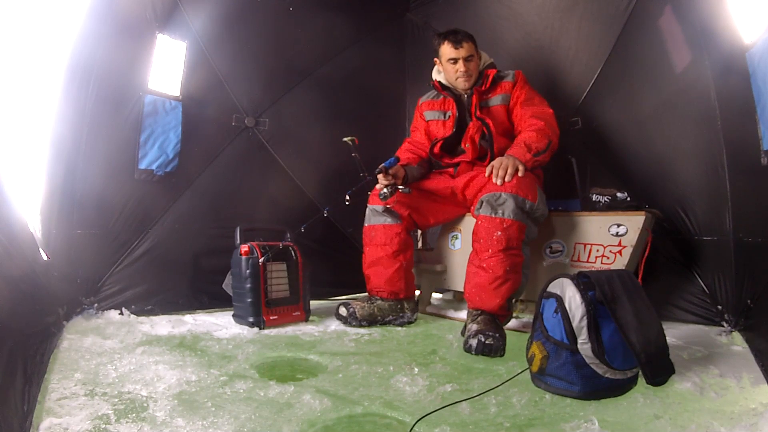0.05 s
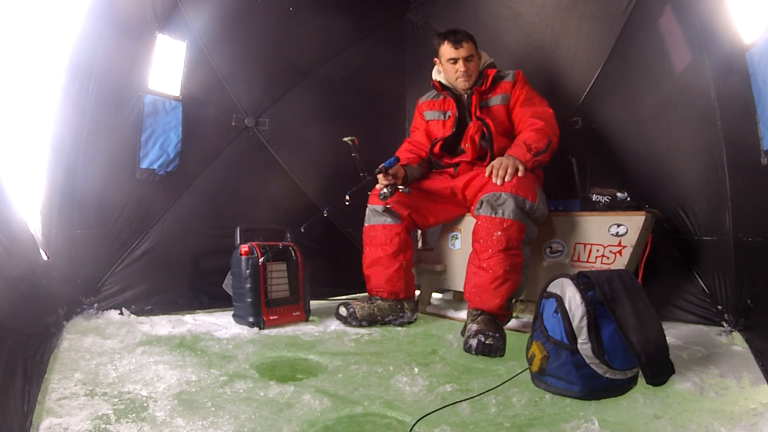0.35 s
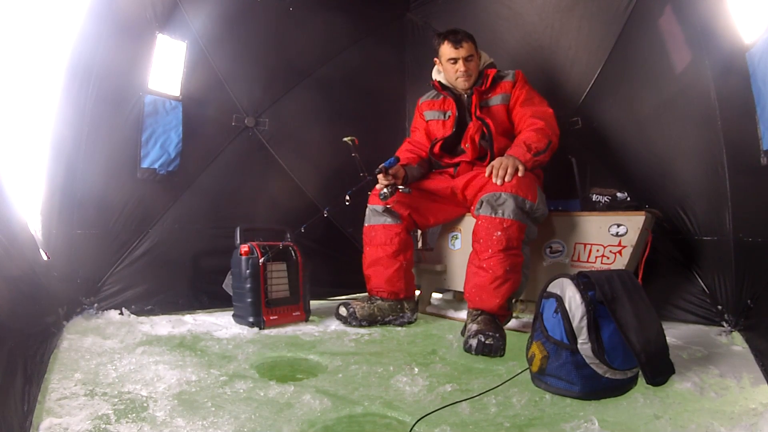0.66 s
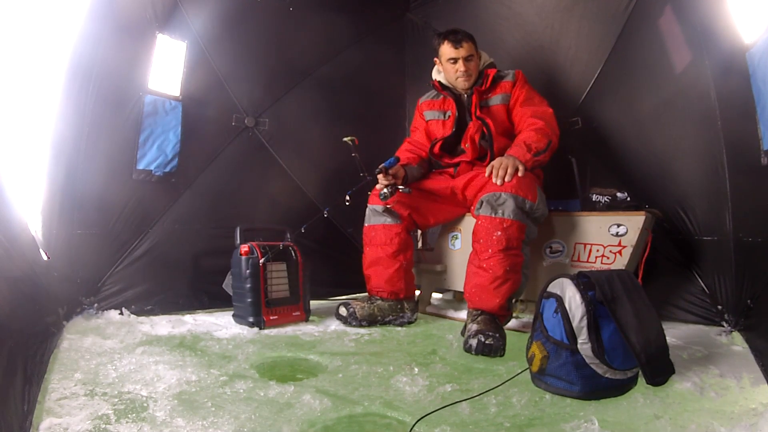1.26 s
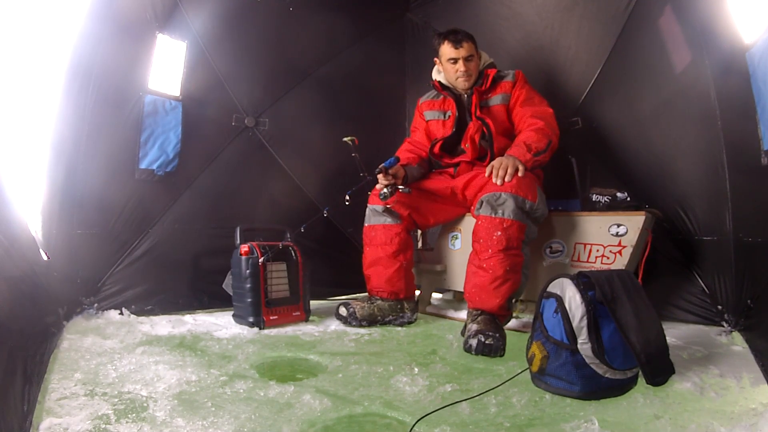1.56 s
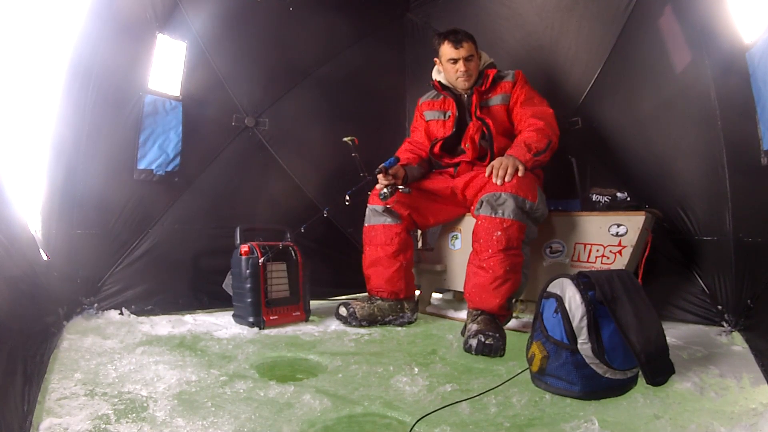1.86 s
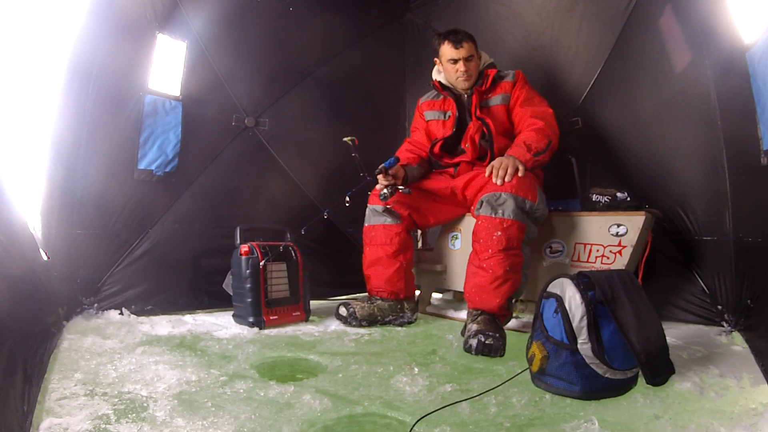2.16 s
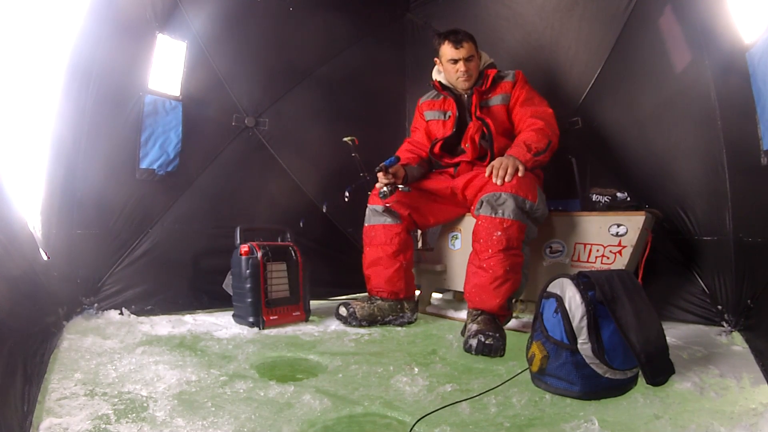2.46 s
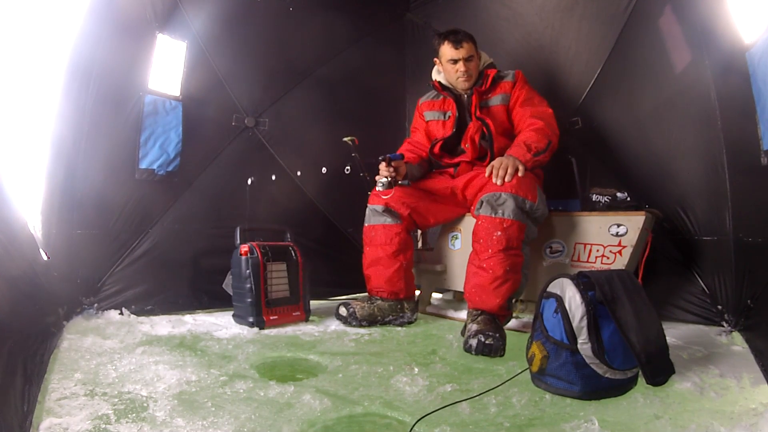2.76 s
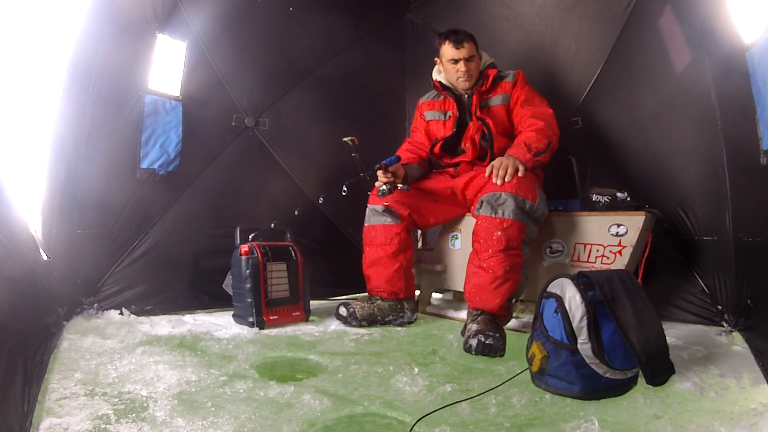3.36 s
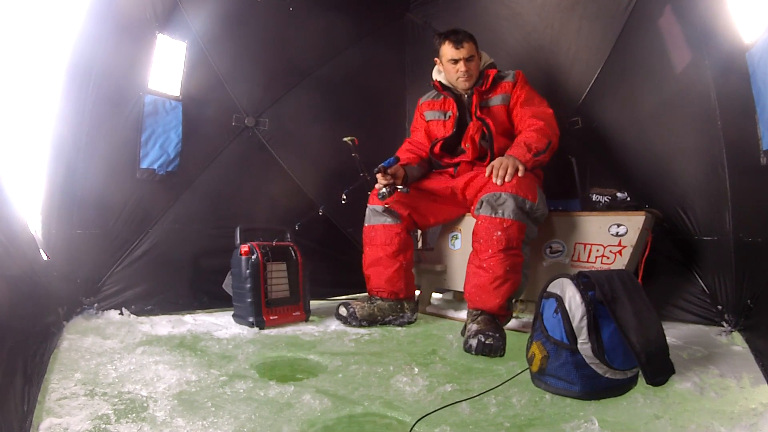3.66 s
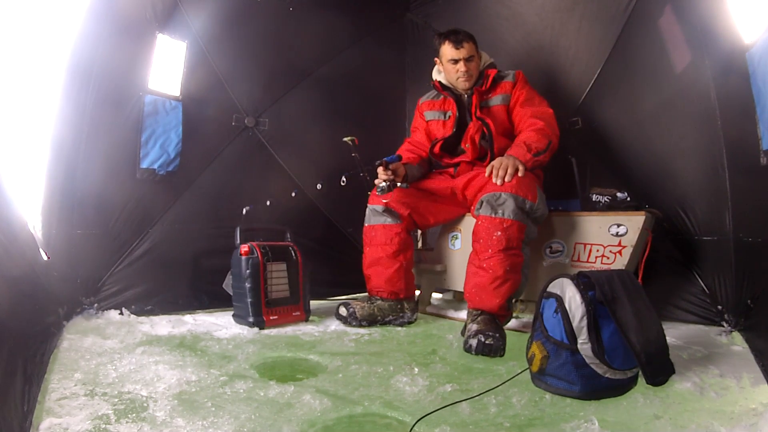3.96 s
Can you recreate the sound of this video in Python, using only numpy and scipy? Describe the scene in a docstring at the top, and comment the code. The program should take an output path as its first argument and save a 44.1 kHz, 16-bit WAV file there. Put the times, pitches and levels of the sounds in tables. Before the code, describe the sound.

Lake ice cracks under a fishing shelter: a faint chirp first, then one sharp, crunchy snap, followed by scattered glassy chirps and dull thumps. A faint low rumble and hiss continue underneath, heard from inside the shelter.

```python
"""Glassy, falling chirps ring out over a low rumble: lake ice cracking under a fishing shelter.
Each crack bends the ice sheet in a wave whose high notes travel fastest, so it arrives as a chirp
(the farther, the slower) in a wash of scattered waves. Far-off cracking merges into a rumble that
keeps the shelter booming, and a few tiny ticks sound close by. The recorder hisses and holds its
samples at a low rate, which adds the glassy sheen to every crack."""
import sys
import numpy as np
from scipy import signal
from scipy.fft import rfft, irfft
from scipy.io import wavfile

SR = 44100
rng = np.random.default_rng(int(sys.argv[2]) if len(sys.argv) > 2 else 0)


def dump(signal):
    """Clip the signal to [-1, 1] and save it as 16-bit WAV at the path in sys.argv[1]."""
    limited = np.clip(np.atleast_2d(signal).T, -1, 1)
    pcm = np.round(limited * 32767).astype(np.int16)
    wavfile.write(sys.argv[1], SR, pcm)


N = 176400
HZ = np.maximum(np.arange(N + 1) * SR / (2 * N), 1)  # frequencies in a spectrum of 2 * N samples


def from_db(db):
    """Turn decibels into a number to multiply by."""
    return 10 ** (np.asarray(db) / 20)


def rms_one(x):
    """Scale a signal so that its average strength (rms) is 1."""
    return x / np.sqrt(np.mean(x ** 2) + 1e-20)


def level(points):
    """Gain over time from (time [s], level [dB]) points."""
    return from_db(np.interp(np.arange(N) / SR, *np.transpose(points)))


def colour(points, hz):
    """Gain at each frequency from (frequency [Hz], level [dB]) points."""
    point_hz, db = np.transpose(points)
    return from_db(np.interp(np.log(hz), np.log(point_hz), db))


def noise(points):
    """Noise of strength 1 with the given colour, its balance of lows and highs."""
    return rms_one(irfft(rfft(rng.standard_normal(2 * N)) * colour(points, HZ))[:N])


def drift(rate_hz):
    """A random wobble of strength 1, mostly slower than the given rate."""
    return rms_one(irfft(rfft(rng.standard_normal(2 * N)) / (1 + (HZ / rate_hz) ** 2))[:N])


def background():
    """A faint, steady, low noise lies under everything."""
    # colour of the noise: (frequency [Hz], relative level [dB])
    tone = [(15, -28), (25, -11.5), (50, -5.5), (85, -3.5), (105, -1.5), (125, 2.5), (180, 1.5), (260, -10),
            (400, -24.5), (700, -33), (1500, -40.5), (5000, -62.5)]
    return from_db(-51) * noise(tone)


def far_rumble():
    """Many distant cracks blur into one rumble that swells and sinks."""
    # loudness of the rumble: (time [s], relative level [dB])
    swells = [(0.03, -66), (0.59, -63.5), (0.66, -56), (1.18, -60), (1.59, -57), (1.65, -46.5),
              (1.7, -52.5), (2.38, -59), (2.45, -54), (2.51, -61.5), (2.84, -55.5), (2.88, -47.5),
              (3.15, -60), (3.21, -49.5), (3.59, -61), (3.74, -55), (3.78, -59), (4.0, -63)]
    # colour of the rumble: (frequency [Hz], relative level [dB])
    tone = [(100, -22), (160, -5.5), (220, -2), (265, -2), (320, -10), (420, -13.5), (560, -20),
            (800, -30.5), (1500, -44.5), (5000, -64)]
    return from_db(0.5) * level(swells) * noise(tone)


def shelter_boom():
    """The shelter's low note, kept going by far-off cracking, wavers in pitch and loudness."""
    # loudness of the boom: (time [s], relative level [dB])
    swells = [(0.0, -41), (0.07, -38), (0.24, -61.5), (0.95, -47.5), (0.99, -80), (1.19, -40), (1.29, -50),
              (1.5, -40), (1.61, -45.5), (1.67, -36), (1.73, -49), (1.84, -39.5), (2.06, -57.5),
              (2.13, -35), (2.16, -54.5), (2.37, -48), (2.43, -66), (2.46, -53.5), (2.72, -51.5),
              (2.94, -45.5), (3.17, -58), (3.24, -41), (3.35, -44.5), (3.42, -61), (3.49, -40.5),
              (3.53, -64), (3.58, -44), (3.71, -63.5), (3.77, -48.5), (4.0, -48.5)]
    pitch_hz = 165.6 + 6.16 * drift(rate_hz=26.9)
    note = np.sqrt(2) * np.sin(2 * np.pi * np.cumsum(pitch_hz) / SR)
    flutter = from_db(-2.15 + 1.78 * drift(rate_hz=22.6))
    return level(swells) * note * flutter


def ticks():
    """Tiny clicks inside the shelter ring for a few milliseconds."""
    # the clicks: (time [s], relative level [dB])
    clicks = [(0.0816, -61), (0.1125, -67), (3.5162, -72)]
    # notes in each click: (frequency [Hz], relative level [dB], time to fade by 60 dB [s])
    notes = [(2380, 7, 0.0067), (4470, 6, 0.0096)]
    out, t = np.zeros(N + SR), np.arange(SR // 10) / SR
    ring = sum(from_db(db - 60 * t / fade_s) * np.sin(2 * np.pi * hz * t) for hz, db, fade_s in notes)
    for time_s, db in clicks:
        start = int(time_s * SR)
        out[start:start + len(t)] += from_db(db) * ring
    return out[:N]


def shelter(hz):
    """How the shelter changes each frequency: sound bounces between its walls and makes it ring."""
    # notes at which the shelter and its floor ring: (frequency [Hz], width [Hz], gain [dB])
    resonances = [(168, 37, -0.5), (540, 53, 1.5), (745, 33, -2), (1033, 33, 2), (1197, 62, -4.5),
                  (1480, 100, -8), (1590, 35, 1), (1910, 100, -13), (2250, 110, -6), (2360, 69, -2),
                  (2560, 33, -6), (2850, 51, 0)]
    round_trip_s, echo_db = .00303, -15.5  # each round trip turns the wave upside down
    direct_and_echoes = 1 / (1 + from_db(echo_db) * np.exp(-2j * np.pi * hz * round_trip_s))
    ringing = sum(from_db(db) / (1 + 2j * (hz - centre) / width) for centre, width, db in resonances)
    return direct_and_echoes + ringing


def splinters():
    """The nearest crack splinters the surface of the ice with a short, bright, grainy crunch."""
    # colour of the crunch: (frequency [Hz], relative level [dB])
    tone = [(500, -19), (1000, -4), (1700, 2.5), (2300, -5), (2900, -5), (3700, -12.5), (5000, -13.5),
            (6000, -29)]
    start_s, rise_s, fade_s = 1.642, 0.013, 0.16
    age = np.maximum(np.arange(N) / SR - start_s, 0)
    envelope = np.minimum(age / rise_s, 1) * from_db(-41.5 - 60 * age / fade_s)
    crunch = noise(tone) * from_db(-1.5 * drift(rate_hz=460))  # the fast wobble makes it grainy
    in_shelter = irfft(rfft(crunch, 2 * N) * shelter(HZ))[:N]
    return envelope * rms_one(in_shelter)


def scattered_waves(t, hz, fade_s):
    """Spectrum of the waves scattered by flaws in the ice; each octave fades at its own rate."""
    late_db, late_fade_s = -14.5, 0.66  # a quieter tail that lingers
    octaves_hz = 125 * 2.0 ** np.arange(7)
    spectrum = 0
    for k, centre in enumerate(octaves_hz):
        age = np.maximum(t, 0) * (centre / 1000) ** 0.81  # high notes die first
        fade = from_db(-60 * age / fade_s) + from_db(late_db - 60 * age / late_fade_s)
        tail = rng.standard_normal(len(t)) * fade * (t > 0)
        octave_share = np.interp(np.log(hz), np.log(octaves_hz), np.eye(len(octaves_hz))[k])
        spectrum = spectrum + np.sqrt(octave_share) * rfft(tail)
    fade_energy = fade_s * SR / (2 * np.log(1000))
    return spectrum / np.sqrt(fade_energy)


def cracks():
    """Fast waves swell up first; then the bending ice stretches each snap into a falling chirp."""
    # cracks in the ice: (time [s], delay at 1 kHz [s], snap relative level [dB], ring pitch [Hz],
    # ring gain [dB], ring sharpness [Q], scatter relative level [dB], bass edge [Hz], treble edge [Hz],
    # swell head start [s], swell relative level [dB], time for scatter at 1 kHz to fade by 60 dB [s])
    events = [(.465, .066, -11, 270, 9, 4.8, -25, 220, 1010, .02, -31, .25),
              (1.351, .012, -33, 595, 0, 5, -14, 400, 1380, 0.053, -16, 0.39),
              (1.6420, 0.00357, 7.5, 1880, -0.5, 3.7, 4.8, 109, 2300, 0.0057, 1, 0.096),
              (1.782, .023, -16, 1550, 16, 5.8, -6.5, 276, 2070, 0.032, -9.5, 0.2),
              (2.070, .043, -21, 990, 19.5, 6.3, -6, 300, 1290, .012, -10, 0.16),
              (2.294, 0.047, -12, 300, 14, 3.2, -19, 220, 384, .02, -31, 0.12),
              (2.514, .005, 10, 84, 17.5, 6.9, -5, 59.4, 105, .02, -25, 0.11),
              (2.8332, .0135, -2.5, 646, 7.5, 3.8, -3, 260, 1920, .023, -6, 0.21),
              (3.175, .014, -25, 540, 37, 55, -4.5, 430, 1470, 0.031, -2, .29),
              (3.18, 0.01, -1.5, 240, 6, 5.9, -16, 130, 296, .02, -15, 0.4),
              (3.549, 0.05, -16, 240, 1, 5.4, -19, 200, 340, .02, -31, .25),
              (3.951, 0.017, -13, 540, 4, 13, -13, 302, 706, 0.023, -23, 0.39)]
    # what a crack carries through the ice: (frequency [Hz], relative level [dB])
    tone = [(60, -7), (170, 9), (330, 7), (500, 0.5), (800, -0.5), (1200, -1.5), (1370, -3.5), (1800, 0),
            (2500, -5), (3600, -3), (5500, -1.5)]
    treble_slope, bass_slope = 5.2, 2.1  # steepness of the edges, in steps of 6 dB per octave
    out, early = np.zeros(N + 2 * SR), SR // 8  # early leaves room for the swell
    t = (np.arange(SR) - early) / SR
    hz = np.maximum(np.arange(SR // 2 + 1), 1)
    path = from_db(-10) * colour(tone, hz) * shelter(hz)
    for (time_s, delay_s, snap_db, ring_hz, ring_db, sharpness, scatter_db,
         bass_hz, treble_hz, lead_s, swell_db, fade_s) in events:
        rise = from_db(8 * np.minimum(t, delay_s) / (lead_s + delay_s))
        swell = rise * (t > -lead_s) * (t < delay_s) * rng.standard_normal(SR)
        fast_waves = from_db(swell_db) * rfft(rms_one(swell)) / np.sqrt(SR)
        ring = from_db(ring_db) / (1 + 1j * sharpness * (hz / ring_hz - ring_hz / hz))
        snap = from_db(snap_db) * rfft(1.0 * (t == 0)) * (1 + ring)
        wash = from_db(scatter_db) * scattered_waves(t, hz, fade_s)
        # half the frequency takes twice as long to arrive
        bending = np.exp(-2j * np.pi * delay_s * 1000 * np.log(hz / 1000))
        wave = fast_waves + bending * (snap + wash)
        treble_cut = (1 + (hz / treble_hz) ** (2 * treble_slope)) ** -.5
        bass_cut = (1 + (bass_hz / hz) ** (2 * bass_slope)) ** -.5
        start = int(time_s * SR)
        out[start:start + SR] += irfft(wave * path * treble_cut * bass_cut)
    return out[early:early + N]


def scene():
    """Every sound reaches the left and right channels alike."""
    mix = cracks() + splinters() + shelter_boom() + far_rumble() + background() + ticks()
    return np.tile(mix, (2, 1))


def record(dry):
    """The recorder hisses and holds each slow sample, which mirrors the sound into a glassy treble."""
    # hiss shared by both channels: (frequency [Hz], relative level [dB])
    shared_tone = [(100, 0), (700, 1), (1500, -3), (3000, -4), (4500, -6), (5200, -7), (5650, -14.5),
                   (6000, -17.5)]
    # hiss with opposite signs left and right: (frequency [Hz], relative level [dB])
    side_tone = [(25, 12), (60, 18), (130, -12), (300, 9), (700, 5), (1500, 2.5), (3000, 2), (5000, 1.5)]
    hold_rate_hz, cutoff_hz = 12000, 15150
    hissy = dry.mean(0) + from_db(-69.5) * noise(shared_tone)
    slow = signal.resample(hissy, N * hold_rate_hz // SR)
    held = signal.resample_poly(np.repeat(slow, 4), SR, 4 * hold_rate_hz)
    side_hiss = signal.sosfilt(signal.butter(8, 5400, fs=SR, output="sos"), noise(side_tone))
    stereo = held + from_db(-76) * side_hiss * [[1], [-1]]
    treble_cut = signal.ellip(10, .2, 70, cutoff_hz, fs=SR, output="sos")
    return signal.sosfilt(treble_cut, stereo)


dry = scene()
out = record(dry)
dump(out)
```